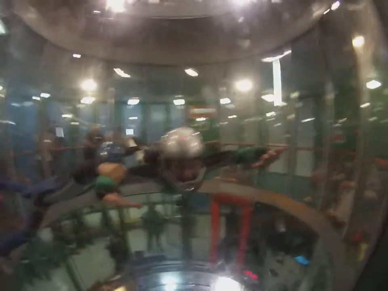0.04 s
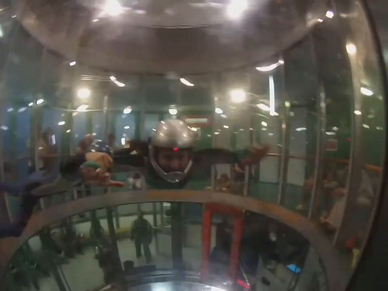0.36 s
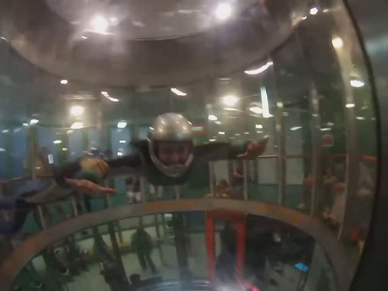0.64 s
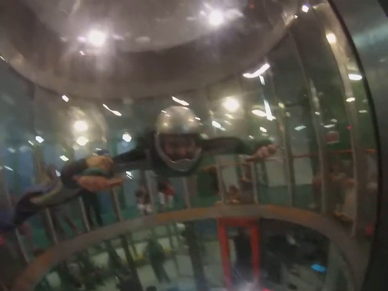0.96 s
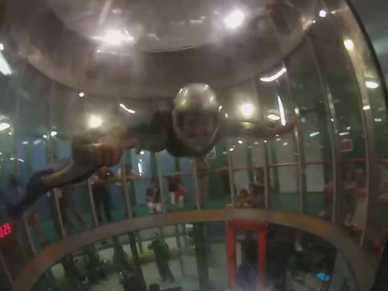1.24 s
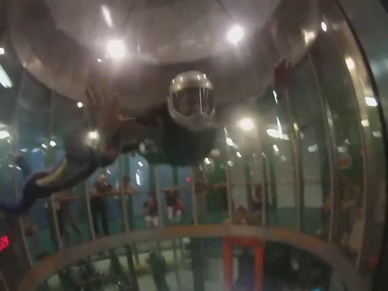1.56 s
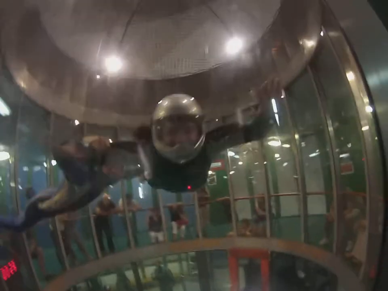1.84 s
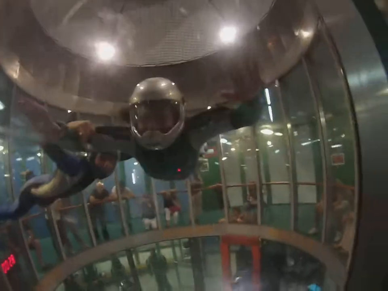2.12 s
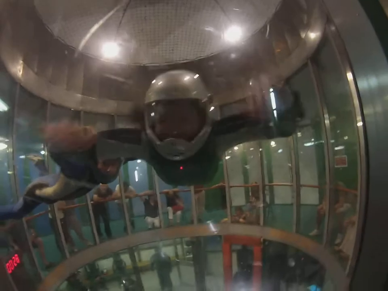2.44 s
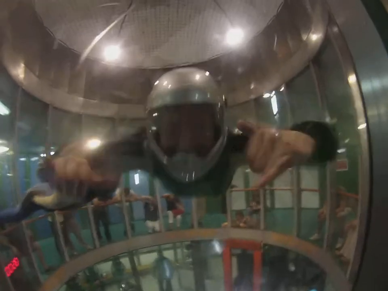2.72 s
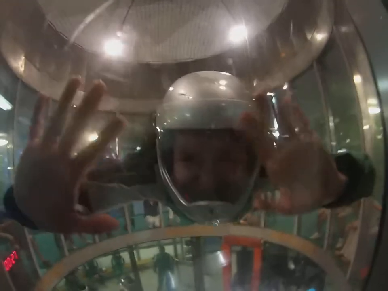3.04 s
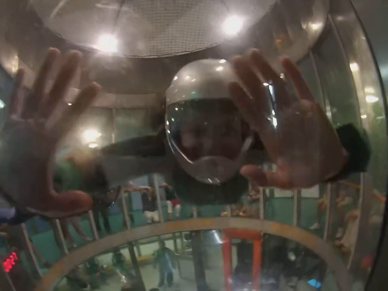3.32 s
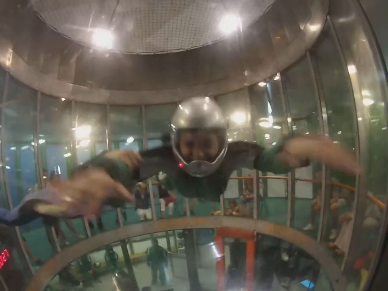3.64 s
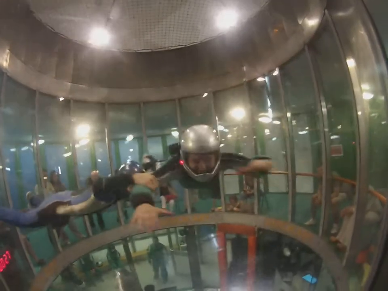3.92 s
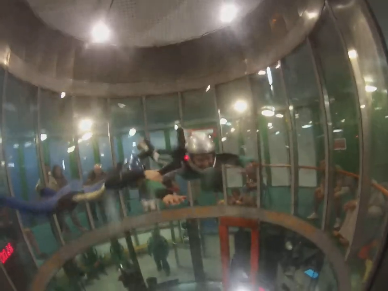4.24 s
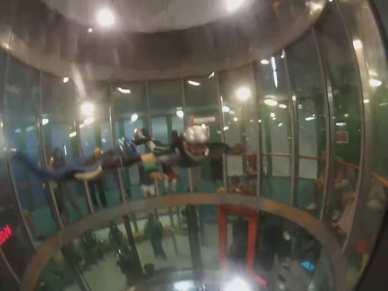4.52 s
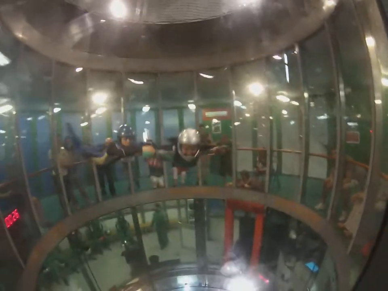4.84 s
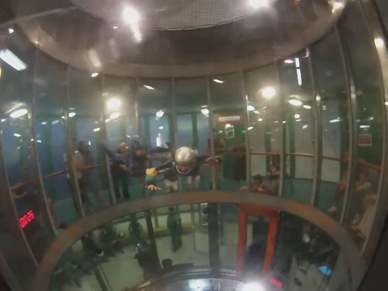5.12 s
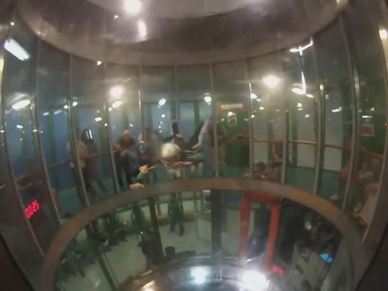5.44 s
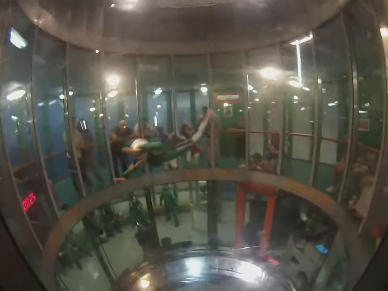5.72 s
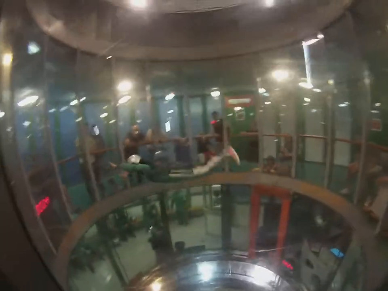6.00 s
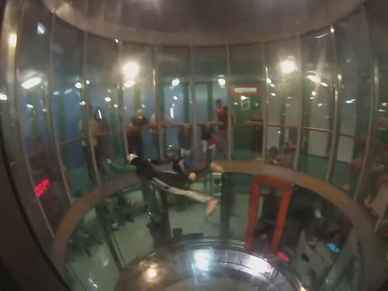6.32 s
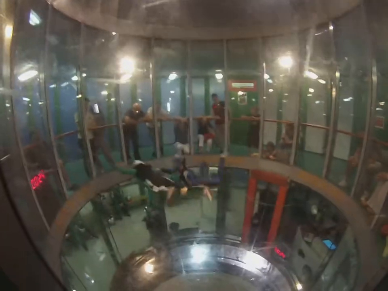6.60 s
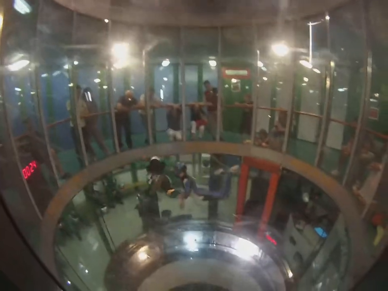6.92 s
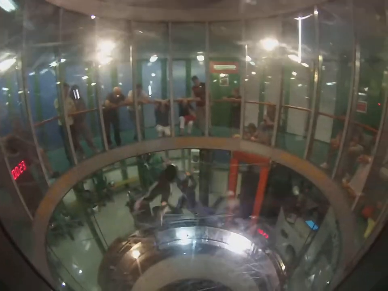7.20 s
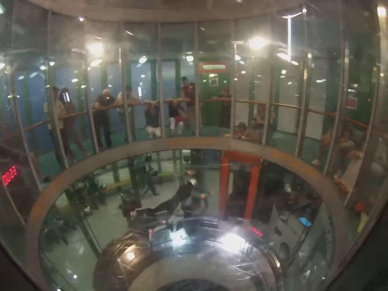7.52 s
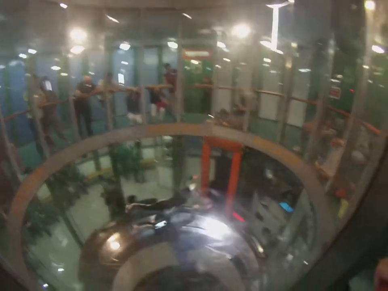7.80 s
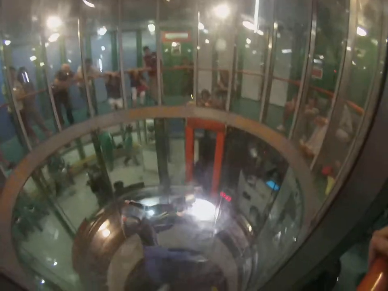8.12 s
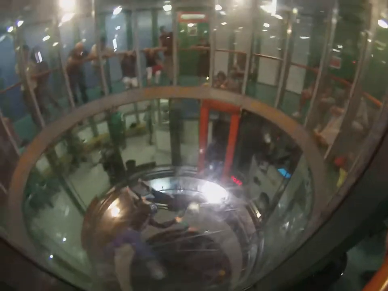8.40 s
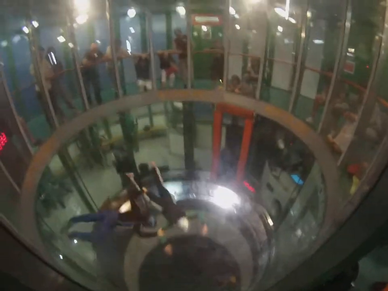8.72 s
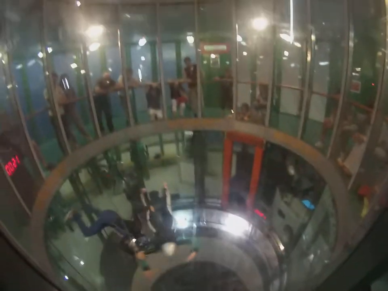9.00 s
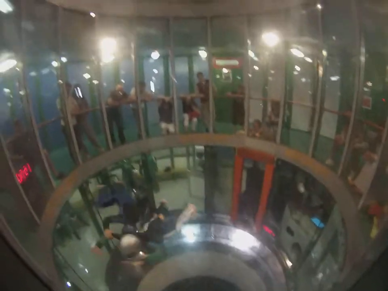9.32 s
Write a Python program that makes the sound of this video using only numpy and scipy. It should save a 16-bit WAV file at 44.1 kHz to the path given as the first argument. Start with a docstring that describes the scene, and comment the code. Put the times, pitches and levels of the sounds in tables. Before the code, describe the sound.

A vertical wind tunnel roars for the whole nine seconds or so, heard from just outside its glass flight chamber. A deep rumble throbs in short, uneven surges under a hollow roar and a steady rush of air with a fine hiss on top. Breathy whistling bands run through it, drifting slightly in pitch, and faint low tones come and go. Between about 1.3 and 2 seconds a soft airy moan sinks a little. Around 3 seconds the low buffeting and the whistling grow slightly as a flyer comes up to the glass. From 3 to 6 seconds a thin, wavering ring appears several times, returning more faintly after 8 seconds. A low boom swells around 5.5 to 6.5 seconds and again from 7.5 to 9. A few very faint ticks are nearly buried in the wind, near 2.7, 4.3 and 8.6 seconds.

```python
"""A deep, surging rumble under a steady rush of air: a vertical wind tunnel, heard from just outside
its glass flight chamber. Turbulence buffets the duct, pumps its lowest air mode in surges and roars in
the chamber's modes. Vortices shed at the vanes and the cable net sing in broad bands and at times lock
into a ring. The stream hisses over the net and the flyers, with a few faint ticks.
Eddies, song and hiss grow as a flyer comes up to the glass."""
import sys
import numpy as np
from scipy import signal
from scipy.fft import rfft, irfft
from scipy.io import wavfile
from scipy.ndimage import uniform_filter1d, map_coordinates

SR = 44100
rng = np.random.default_rng(int(sys.argv[2]) if len(sys.argv) > 2 else 0)


def to_wav(s):
    """Save 16-bit WAV."""
    ch = np.atleast_2d(s).T  # columns
    pcm = np.round(np.clip(ch, -1, 1) * 32767)  # PCM
    wavfile.write(sys.argv[1], SR, pcm.astype(np.int16))


N = 412335
TIME = np.arange(N) / SR
FREQ = np.maximum(np.arange(N // 2 + 1) * SR / N, 1)

# The flyer nearest the glass. Each row: time in seconds, nearness from 0 (far) to 1 (right in front).
FLYER_NEARNESS = [(0, .25), (1, 0.26), (1.6, 0.4), (2.4, 0.61), (2.95, 0.88), (3.4, 0.72), (3.9, 0.65),
                  (4.8, 0.49), (5.4, 0.12), (6.3, 0.22), (7.9, 0.46), (9.35, .04)]


def undb(db):
    """Amplitude ratio of a level in decibels."""
    return 10 ** (np.asarray(db) / 20)


def curves(table):
    """Linear interpolation in time: each column after the first becomes one value per sample."""
    seconds, *columns = np.transpose(table)
    return [np.interp(TIME, seconds, column) for column in columns]


def fader(track):
    """Amplitude envelope through rows of time in seconds and level in dB."""
    return undb(curves(track)[0])


def slope(points):
    """Broadband spectrum through rows of frequency in Hz and level in dB, rolling off beyond both ends."""
    hz, db = np.transpose(points)
    ends = np.minimum(FREQ / hz[0], 1) * np.minimum(hz[-1] / FREQ, 1)
    return undb(np.interp(np.log(FREQ), np.log(hz), db)) * ends ** 2


def resonances(modes):
    """Incoherent sum: each steep resonance is driven by its own eddies, so their powers add."""
    gains = (undb(db) / (1 + ((FREQ - hz * hz / FREQ) / width) ** 2) for hz, width, db in modes)
    return np.sqrt(sum(gain ** 2 for gain in gains))


def standing_waves(spacing_hz=9, spread_db=1.2):
    """Interference of reflections between the glass walls ripples the spectrum."""
    grid = np.arange(0, SR / 2, spacing_hz)
    return undb(np.interp(FREQ, grid, spread_db * rng.standard_normal(len(grid))))


def noise(spectrum):
    """Turbulent pressure as Gaussian noise of rms 1; only the shape of the spectrum counts."""
    pressure = irfft(rfft(rng.standard_normal(N)) * spectrum, N)
    return pressure / pressure.std()


def band(hz, width_hz):
    """Response of a single resonance to turbulence, at rms 1."""
    return noise(resonances([(hz, width_hz, 0)]))


def walk(rate_hz):
    """Low-pass random fluctuation with mean 0 and standard deviation 1."""
    return noise(1 / (1 + (FREQ / rate_hz) ** 4) * (np.arange(len(FREQ)) > 0))


def sustained(pressure, span_s):
    """A steadily fed flow keeps its mean power over the span and flutters within it."""
    power = uniform_filter1d(pressure * pressure, max(int(span_s * SR), 1))
    return pressure / np.sqrt(np.maximum(power, 1e-9))


def swell(start, length, attack_s, release_s):
    """Envelope of a driven resonance: it builds up, holds and dies away."""
    rise = np.clip((TIME - start) / attack_s, 0, 1)
    fall = np.clip(1 - (TIME - start - length) / release_s, 0, 1)
    return rise * fall ** 2


def tone(hz):
    """Sinusoid of rms 1 whose phase is the integral of its frequency."""
    return np.sqrt(2) * np.sin(2 * np.pi * np.cumsum(hz) / SR)


def bend(sound, ratio):
    """Resampling multiplies every frequency by a moving ratio."""
    return map_coordinates(sound, [np.cumsum(ratio)], order=3, mode="mirror")


def glide(track, modes, waver, flutter_db=0.0):
    """Vortex shedding at a moving pitch: the first resonance follows the track, the rest in proportion."""
    hz, db = curves(track)
    vortices = noise(resonances(modes))
    ratio = hz / modes[0][0] * (1 + waver * walk(13.03))
    return bend(vortices, ratio) * undb(db + flutter_db * walk(14))


def duct_throb(hz=50.94, wander_hz=0.73, roughness=0.078, idle_db=-43.5):
    """Lock-in: the stream pumps the duct's lowest air mode in surges; between them eddies only stir it."""
    # Each row: start in seconds, length in seconds, level in dB.
    surges = [(0.0, 0.16, -34), (0.39, 0.062, -34), (0.6, 0.23, -33), (0.996, 0.39, -33.5),
              (1.505, .12, -36), (2.19, 0.16, -30), (2.42, 0.34, -30), (3.17, 0.2, -33.5),
              (3.574, 0.36, -33.5), (4.25, 0.12, -34.5), (4.415, 0.19, -30), (4.62, 0.23, -33),
              (5.04, .18, -37), (5.523, 0.065, -34.5), (5.73, 0.38, -35), (6.212, .053, -39),
              (6.827, 0.2, -32.5), (7.347, 0.49, -39), (8.148, 0.2, -29), (8.599, 0.073, -39)]
    locked = tone(hz + wander_hz * walk(2.6))
    stirred = sustained(band(hz, width_hz=10), span_s=0.43)
    pumping = np.max([swell(start, length, attack_s=0.023, release_s=0.22) * undb(db)
                      for start, length, db in surges], axis=0)
    idle = np.maximum(undb(idle_db) - pumping / 2, 0)
    return locked * pumping + stirred * (idle + roughness * pumping)


def wall_rumble():
    """Turbulent wall pressure: large eddies buffet the walls, and a flyer's wake beats on the glass."""
    # Each row: frequency in Hz, relative level in dB.
    buffet_spectrum = [(5, -25), (11, 2), (18, 9), (39, 8.5), (45, -5), (52, -25), (65, -33)]
    eddy_spectrum = [(42, -31), (60, 6), (100, 5), (118, 2.5), (160, -31)]
    # Each row: time in seconds, level in dB.
    buffet_levels = [(0, -36), (.8, -34.5), (1.45, -42), (2.0, -40), (2.6, -42), (3.1, -33), (3.8, -39),
                     (4.65, -41), (5.5, -38.5), (6.4, -41.5), (7.9, -36), (8.4, -37.5), (9.35, -41)]
    eddy_levels = [(0, -38.5), (1.2, -38), (1.6, -41.5), (2.0, -39.5), (2.4, -38.5), (2.85, -34),
                   (3.45, -35), (3.85, -38), (4.9, -37), (5.6, -41), (6.55, -37), (7.05, -42.5), (7.8, -35),
                   (8.4, -39), (9.35, -41.5)]
    buffet = sustained(noise(slope(buffet_spectrum)), span_s=0.19) * fader(buffet_levels)
    eddies = sustained(noise(slope(eddy_spectrum)), span_s=0.57) * fader(eddy_levels)
    return buffet + eddies


def chamber_roar():
    """Forced response: smaller eddies excite the chamber's air modes above a broad roar."""
    # Each row: frequency in Hz, relative level in dB.
    broad_spectrum = [(90, -32), (130, -2), (205, -1.5), (232, -4.5), (255, -6), (310, -9), (400, -14.5),
                      (520, -15), (750, -27), (1500, -50)]
    # Each row: frequency in Hz, width in Hz, relative level in dB.
    air_modes = [(131, 11.6, 3.5), (188.4, 11.4, -2.5), (284, 25.5, -2.5), (325.5, 7.7, -7),
                 (347.5, 21, -6.5), (373, 22, -14.5), (408, 39, -10.5), (465, 22, -11.5)]
    # Each row: time in seconds, level in dB.
    levels = [(0, -37), (.7, -36), (1.6, -35.5), (2.4, -38.5), (3.1, -35), (3.8, -36), (4.9, -35.5),
              (5.5, -37), (6.7, -36), (7.7, -36.5), (8.3, -35.5), (9.35, -36.5)]
    spectrum = np.hypot(slope(broad_spectrum), resonances(air_modes))
    return sustained(noise(spectrum), span_s=0.38) * fader(levels)


def duct_boom():
    """A broad, low resonance of the duct swells when the flyers dive."""
    # Each row: time in seconds, level in dB.
    levels = [(0, -39.5), (1.4, -53), (2.3, -50), (3.4, -61), (5.3, -43), (6.5, -40), (7.3, -49),
              (7.55, -37), (8.3, -38), (8.9, -37.5), (9.35, -43)]
    return band(hz=158, width_hz=55) * fader(levels)


def chamber_hollow(body_hz=425, body_width_hz=200):
    """Cavity resonance gives the chamber a hollow hum and the roar its upper body."""
    # Each row: time in seconds, level in dB.
    hum_levels = [(0, -61), (1.3, -51), (2.2, -38), (2.7, -45), (4.4, -39.5), (5.3, -45.5), (6.6, -43),
                  (7.6, -42.5), (9.35, -43.5)]
    body_levels = [(0, -48), (.6, -48), (1.0, -52), (1.4, -45.5), (2.4, -49.5), (3.3, -51), (3.8, -42.5),
                   (4.9, -47.5), (5.5, -53), (6.3, -50), (8.2, -48), (8.8, -46), (9.35, -50)]
    hum = sustained(band(hz=198, width_hz=46), span_s=0.18)
    body = noise(resonances([(body_hz, body_width_hz, 0)]) * standing_waves())
    return hum * fader(hum_levels) + body * fader(body_levels)


def vortex_song(high_db=-44, octave_db=-56, near_rise_db=1.5, octave_follow=0.3, speed_spread=0.002003):
    """Aeolian sound: vanes and net shed vortices in bands whose pitch is proportional to air speed."""
    # Shedding bands. Each row: centre in Hz, width in Hz, relative level in dB.
    low_bands = [(1097, 240, 10), (1123, 64, 9)]
    octave_bands = [(2110, 160, -2.5), (2236, 140, -5.5)]
    high_bands = [(1291, 146, 5.8), (1329, 157, 2.5)]
    whistle_bands = [(2797, 160, -9), (2953, 200, -7), (4390, 140, -22.5)]
    # Each row: time in seconds, level in dB.
    low_levels = [(0, -48), (1.05, -47.5), (1.65, -47), (2.6, -45.5), (3.05, -42.5), (3.7, -47.5),
                  (4.4, -47.5), (4.8, -46.5), (5.9, -46), (6.6, -47), (8.3, -46), (9.35, -48.5)]
    whistle_levels = [(0, -55.8), (1.8, -56.5), (3.0, -54.8), (4.1, -57.5), (5.5, -54.5), (6.7, -57.5),
                      (8.0, -57.5), (8.8, -54.7), (9.35, -55.5)]
    # The stream's drive on the high bands. Each row: time in seconds, dB about its usual strength.
    drive = [(0, 1), (.35, 1), (1.6, 0.4), (2.45, -2), (3.0, -0.7), (4.3, 1.5), (5.1, 0.5), (5.6, -2.2),
             (6.35, -2.2), (7.15, -0.5), (7.75, 1), (8.45, 1.5), (8.85, -0.2), (9.35, -2)]
    near, = curves(FLYER_NEARNESS)
    low_db, = curves(low_levels)
    low = noise(resonances(low_bands)) * undb(low_db)
    octave_rise_db = near_rise_db * near + octave_follow * (low_db - low_db.mean())
    octave = noise(resonances(octave_bands)) * undb(octave_db + octave_rise_db)
    high = noise(resonances(high_bands)) * undb(high_db) * fader(drive)
    whistles = noise(resonances(whistle_bands)) * fader(whistle_levels)
    relative_speed = 1 + speed_spread * walk(2.98)
    return bend(low + octave + high + whistles, relative_speed)


def vortex_ring(usual_hz=1235, width_hz=13, wander_hz=3.6, roughness=0.71, idle_db=-54):
    """Lock-in narrows vortex shedding to a wavering tone, each time at a slightly different pitch."""
    # Each row: start in seconds, length in seconds, level in dB, offset from the usual pitch in Hz.
    locks = [(-.3, 0.89, -50.5, -7.5), (1.1, 0.64, -59, -3), (3.08, 0.29, -45, 2), (3.554, .3, -43, -2),
             (3.95, 0.44, -47, 2.5), (4.8, 0.48, -49, 24.5), (5.048, 0.27, -45.5, 7.5),
             (5.78, 0.32, -44, 3.5), (8.05, .55, -51, 1), (8.95, .45, -49, 0)]
    ring = band(usual_hz, width_hz) * undb(idle_db)
    wander = wander_hz * walk(10.0)
    for start, length, db, offset_hz in locks:
        hz = usual_hz + offset_hz
        rough_tone = (tone(hz + wander) + roughness * band(hz, 2 * width_hz)) / np.hypot(1, roughness)
        ring += rough_tone * undb(db) * swell(start, length, attack_s=0.066, release_s=0.21)
    return ring


def airy_whistle():
    """Rapid vortex shedding makes a high whistle that drifts in pitch."""
    # Each row: time in seconds, centre in Hz, level in dB.
    track = [(0, 3278, -53), (1.3, 3285, -51.5), (2.9, 3284, -51), (3.5, 3320, -52), (4.4, 3316, -50.5),
             (5.2, 3270, -52.5), (6.0, 3258, -52), (7.2, 3310, -51), (8.0, 3306, -52), (8.7, 3236, -54),
             (9.35, 3210, -54)]
    # At middle pitch. Each row: centre in Hz, width in Hz, relative level in dB.
    modes = [(3293, 295, 2), (3600, 280, -15)]
    return glide(track, modes, waver=0.008, flutter_db=0.44)


def hollow_whoosh(middle_hz=781.3, width_hz=110):
    """A band of vortex shedding glides as the flyers move."""
    # Each row: time in seconds, centre in Hz, level in dB.
    track = [(0, 603, -53), (1.3, 625, -63), (2.4, 727, -51), (3.4, 729, -56.5), (4.4, 723, -54.5),
             (5.2, 795, -51.5), (5.9, 883, -55.5), (7.0, 938, -53), (7.9, 947, -53), (9.35, 923, -69)]
    return glide(track, [(middle_hz, width_hz, 0)], waver=0.00976)


def air_rush(jet_db=-43.5, net_db=-63.5, suit_db=-66.5, surge_db=0.5, flutter_db=0.04, flap_db=2.0):
    """Broadband flow noise: the jet rushes, the net hisses, and a suit flaps louder as its flyer nears."""
    # Each row: frequency in Hz, relative level in dB.
    jet_spectrum = [(250, -1), (600, -1), (850, -1.5), (1250, 0), (1480, -8), (1570, -3), (1900, -8),
                    (2350, -9), (2600, -14), (3500, -15), (4100, -34)]
    net_spectrum = [(2500, -14), (4200, 0.5), (4900, -2.5), (5200, 2), (5800, -1.5), (6500, .5), (6950, -3),
                    (7500, -9.5), (8100, -10), (8600, -13.5), (11000, -18.5), (14000, -25), (15000, -33)]
    near, = curves(FLYER_NEARNESS)
    jet = noise(slope(jet_spectrum) * standing_waves()) * undb(jet_db + surge_db * walk(7.9))
    net = noise(slope(net_spectrum)) * undb(net_db + flutter_db * walk(18))
    suit = band(hz=5500, width_hz=1800) * near * undb(suit_db + flap_db * walk(22))
    return jet + net + suit


def mode_drones(wander_hz=2.25, flutter_db=0.5):
    """Flow-excited resonance: the stream catches an air mode of the chamber, heard as a faint tone."""
    # Each row: start in seconds, length in seconds, level in dB if fully built up, pitch in Hz.
    drones = [(0.338, 0.33, -44.5, 329), (1.078, 0.16, -47, 581), (1.097, .35, -50.5, 420),
              (1.42, .42, -45.5, 288), (1.827, 0.14, -44.5, 475), (4.55, 0.65, -47.5, 286),
              (5.7, 0.21, -43.5, 286), (6.65, 1.0, -50.5, 286), (8.098, .25, -49, 291),
              (8.417, .18, -53, 581)]
    wander = wander_hz * walk(3.67)
    flutter = undb(flutter_db * walk(10))
    return flutter * sum(tone(hz + wander) * undb(db) * swell(start, length, attack_s=0.16, release_s=0.25)
                         for start, length, db, hz in drones)


def ticks(rise_s=0.006):
    """Faint scuffs: noise transients with a quick rise and an exponential decay."""
    # Each row: start in seconds, level in dB before the envelope, time to fall 60 dB in seconds,
    # spectral tilt in dB per octave.
    scuffs = [(.705, -63, .04, 10), (2.715, -55, .09, 6), (2.9, -57.5, .14, 8), (4.344, -54, .06, 9),
              (4.762, -59.5, .09, -4), (8.604, -50, .11, -.5)]
    # Each row: frequency in Hz, relative level in dB before the tilt.
    spectrum = [(2500, -20), (4500, -3), (5200, 6), (5900, 1), (6800, -3), (7700, -10), (10000, -19),
                (13000, -28), (15000, -40)]
    sound = np.zeros(N)
    for start, db, t60, tilt_db in scuffs:
        age = np.maximum(TIME - start, 0)
        envelope = (1 - np.exp(-age / rise_s)) * np.exp(-np.log(1000) * age / t60)
        sound += undb(db) * envelope * noise(slope(spectrum) * undb(tilt_db * np.log2(FREQ)))
    return sound


def airy_moan(middle_hz=1114, width_hz=82):
    """A brief band of vortex shedding sinks in pitch as a flyer rises."""
    # Each row: time in seconds, centre in Hz, level in dB.
    track = [(1.0, 1165, -85), (1.3, 1150, -50), (1.65, 1115, -46), (2.0, 1065, -51), (2.5, 1050, -85)]
    return glide(track, [(middle_hz, width_hz, 0)], waver=0.008)


def scene():
    """Superposition: the pressures of all the tunnel's sources add at one point."""
    gliding = airy_whistle() + hollow_whoosh() + airy_moan()
    rumble = duct_throb() + wall_rumble() + chamber_roar() + duct_boom() + chamber_hollow()
    singing = mode_drones() + vortex_song() + vortex_ring()
    return (rumble + singing + gliding + air_rush() + ticks())[None]


def record(dry, cutoff_hz=15000):
    """Band limiting: a steep low-pass filter removes the highest treble."""
    return signal.sosfilt(signal.ellip(10, .1, 80, cutoff_hz, fs=SR, output="sos"), dry)


dry = scene()
out = record(dry)
to_wav(out)
```